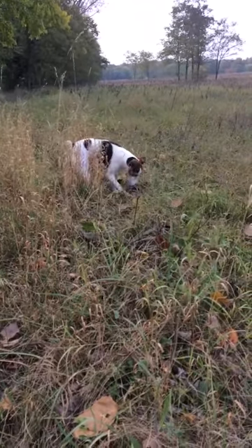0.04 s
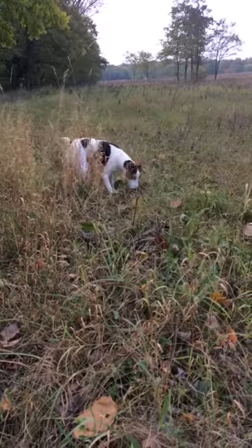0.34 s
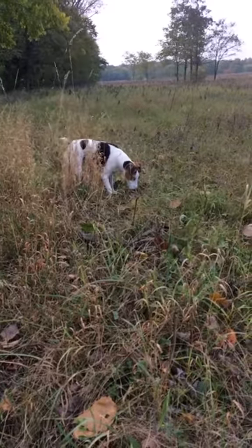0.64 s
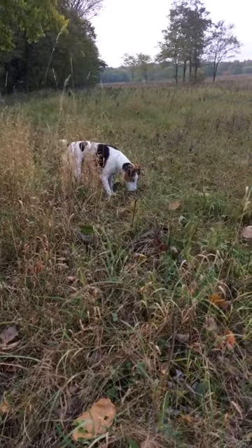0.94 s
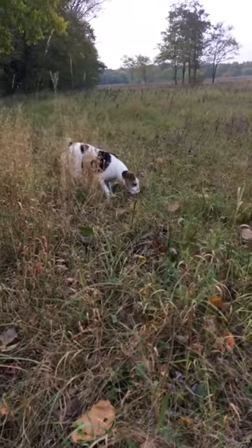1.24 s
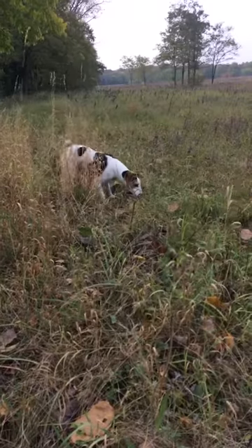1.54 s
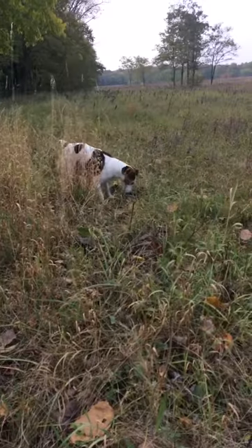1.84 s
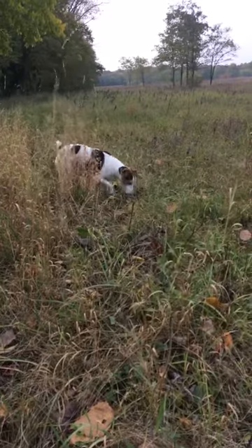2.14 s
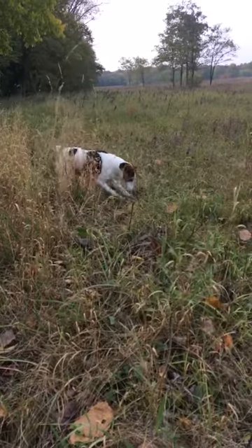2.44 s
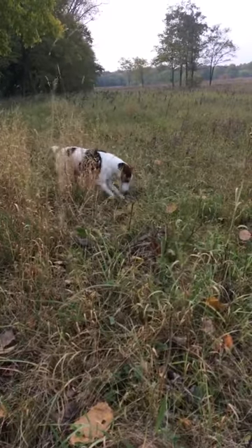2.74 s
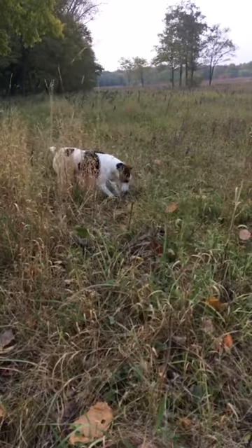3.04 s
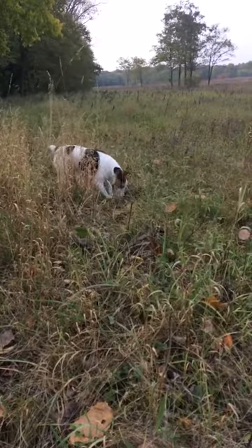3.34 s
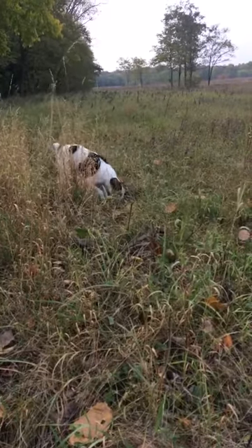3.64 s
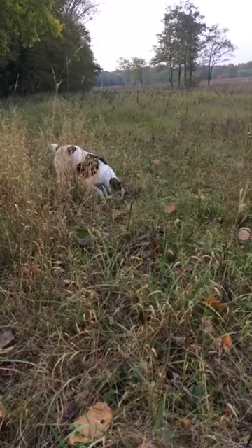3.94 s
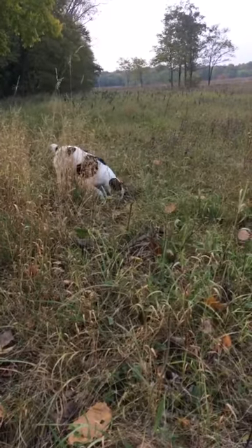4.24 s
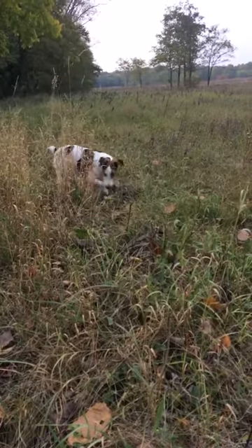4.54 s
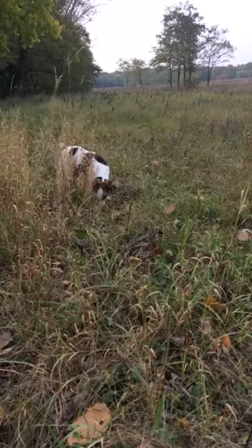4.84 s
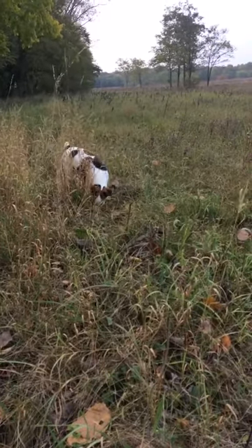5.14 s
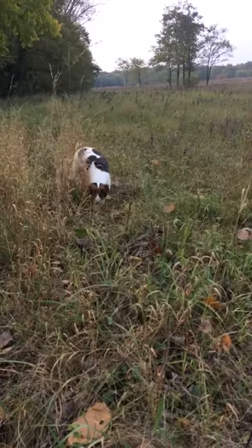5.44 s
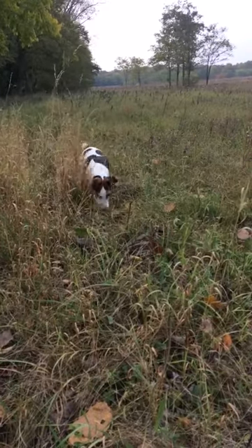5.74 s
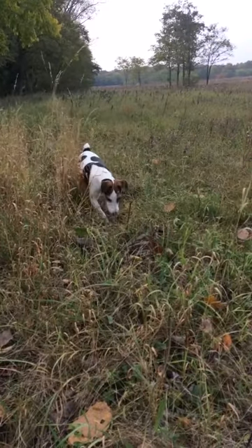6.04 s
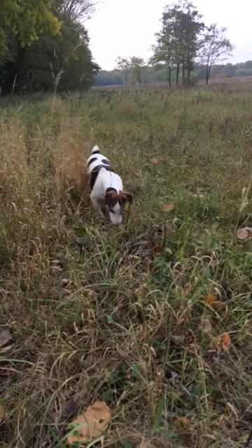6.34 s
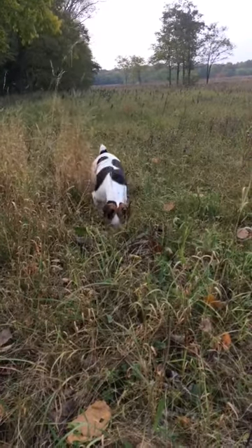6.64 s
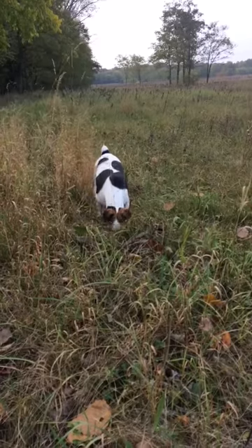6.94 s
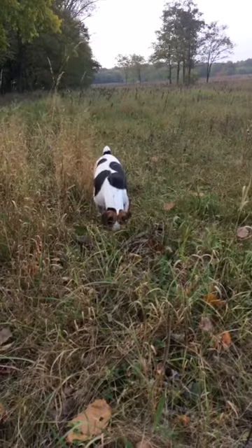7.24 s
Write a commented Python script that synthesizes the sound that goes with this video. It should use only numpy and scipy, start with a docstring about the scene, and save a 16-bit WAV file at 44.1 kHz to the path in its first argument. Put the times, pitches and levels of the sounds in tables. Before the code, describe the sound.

In an open field, low gusty wind rumbles on the microphone over a faint hiss. A few metres away a small dog pushes through dry grass with soft rustles, small stem snaps and faint quick sniffs. Just past the middle it gives one sharp snort, then moves on with more crackling. A bird chirps twice shortly after the snort, and another dog barks very faintly far off now and then.

```python
"""An open field: a few metres away a small dog noses through dry grass, sniffs, snorts once and walks on.
Air hisses through its nostrils; dry blades slide and tick, and stems snap under its paws.
Behind it are a low rumble of wind eddies and a faint hiss of open air.
A bird whistles two chirps, and another dog barks very far off."""
import sys
import numpy as np
from scipy import signal
from scipy.fft import rfft, irfft
from scipy.io import wavfile
from scipy.ndimage import uniform_filter1d

SR = 44100
rng = np.random.default_rng(int(sys.argv[2]) if len(sys.argv) > 2 else 0)


def transcribe(signal):
    """Save signal, clipped to [-1, 1], as a 16-bit WAV file at the path in sys.argv[1]."""
    frames = np.atleast_2d(signal).T
    limited = np.clip(frames, -1, 1)
    pcm = np.round(limited * 32767).astype(np.int16)
    wavfile.write(sys.argv[1], SR, pcm)


N = 326340
TIME = np.arange(N) / SR


def from_db(db):
    """Decibels to gain."""
    return 10 ** (np.asarray(db) / 20)


def unit(x):
    """Scales to rms 1."""
    return x / np.sqrt(np.mean(x ** 2) + 1e-20)


def gains(rows):
    """One gain curve over time per dB column."""
    times_s, *columns_db = np.transpose(rows)
    return [from_db(np.interp(TIME, times_s, db)) for db in columns_db]


def shape(spectrum, hz):
    """Gain of a spectrum at hz."""
    points_hz, db = np.transpose(spectrum)
    return from_db(np.interp(np.log(hz + 1), np.log(points_hz + 1), db))


def resonance(hz, centre_hz, width_hz):
    """Gain of a broad resonance, 1 at its centre."""
    return 1 / (1 + (2 * (hz - centre_hz) / width_hz) ** 2)


def coloured(x, spectrum):
    """Filters x by a spectrum, to rms 1."""
    hz = np.fft.rfftfreq(len(x), 1 / SR)
    return unit(irfft(rfft(x) * shape(spectrum, hz), len(x)))


def noise(spectrum):
    """Turbulence with a given spectrum."""
    return coloured(rng.standard_normal(N), spectrum)


def drift(rate_hz):
    """Smooth random wobble up to about rate_hz, rms 1."""
    hz = np.fft.rfftfreq(N, 1 / SR)
    return unit(irfft(rfft(rng.standard_normal(N)) * np.exp(-(hz / rate_hz) ** 2), N))


def add(mix, start_s, sound):
    """Mixes a sound in at start_s."""
    part = mix[max(round(start_s * SR), 0):][:len(sound)]
    part += sound[:len(part)]


def blast(start_s, attack_s, hold_s, release_s, scatter_db=-12, scatter_s=0.095):
    """Envelope of a blast of air: builds, holds, dies into a tail scattered back by the field."""
    rise = np.clip((TIME - start_s) / attack_s, 0, 1) ** 2
    after_s = np.maximum(TIME - start_s - attack_s - hold_s, 0)
    scatter = from_db(scatter_db) * np.exp(-after_s / scatter_s)
    return rise * np.hypot(np.exp(-after_s / release_s), scatter)


# Spectra of the nostril jet and the hollow rush. Each row: frequency in Hz, gain in dB.
JET_SPECTRUM = [(1470, -44), (2500, -18), (3820, -12), (4520, -9), (5500, -12), (6700, -3), (8540, -3.5),
                (10200, -2.5), (13300, -5.5), (15300, -5.5)]
RUSH_SPECTRUM = [(200, -8), (380, 11.5), (650, 7.5), (1150, 4), (1700, -1.5), (2500, 3.5), (3800, 9.5),
                 (5300, 8.5), (8000, 0), (14000, -17)]


def snort(start_s=4.455, rush_lead_s=0.071, jet_db=-44.5, rush_db=-54.5, flutter_db=1.26):
    """The dog blows its nose clear: a sharp jet over a slower, hollower rush as the nostrils flare."""
    jet = from_db(jet_db) * blast(start_s, attack_s=0.04, hold_s=0.02, release_s=0.017)
    rush = from_db(rush_db) * blast(start_s - rush_lead_s, attack_s=0.13, hold_s=0.03, release_s=0.019)
    flow = jet * noise(JET_SPECTRUM) + rush * noise(RUSH_SPECTRUM)
    return flow * from_db(flutter_db * drift(rate_hz=180))


# Draws of air. Each row: centre in seconds, level in dB, sigma in seconds, nostril resonance in Hz.
SNIFF_DRAWS = [(0.105, -68, 0.045, 4100), (0.119, -58, 0.0064, 4200), (0.909, -69, .012, 4000),
               (1.867, -69, 0.015, 3500), (2.387, -62.5, .025, 3400), (2.414, -61.5, 0.011, 3300),
               (2.445, -58.5, .010, 3650), (2.745, -70, .03, 3400), (3, -66.5, 0.014, 3100)]
# Hiss in the nose. Each row: frequency in Hz, gain in dB.
NOSE_SPECTRUM = [(250, -30), (480, 7), (800, -20), (1300, 5), (1900, -24), (3000, 6.5), (5500, 3),
                 (8000, 0), (14000, -34)]


def sniffs(width_hz=1100, ring_db=2):
    """Quick draws of air hiss in the nose and ring the narrowed nostrils."""
    out, t = np.zeros(N), np.arange(16384) / SR
    hz = np.fft.rfftfreq(len(t), 1 / SR)
    for centre_s, db, sigma_s, nostril_hz in SNIFF_DRAWS:
        colour = shape(NOSE_SPECTRUM, hz) + from_db(ring_db) * resonance(hz, nostril_hz, width_hz)
        flow = unit(irfft(rfft(rng.standard_normal(len(t))) * colour))
        start_s = max(centre_s - t[-1] / 2, 0)
        envelope = np.exp(-0.5 * ((start_s + t - centre_s) / sigma_s) ** 2)
        add(out, start_s, from_db(db) * flow * envelope)
    return out


# Paw and muzzle strokes. Each row: peak time in seconds, relative level in dB, rise and decay in seconds.
GRASS_BRUSHES = [(0.12, -69, 0.067), (0.34, -66, 0.06), (0.47, -69.5, 0.038), (1.365, -64.5, 0.069),
                 (1.59, -74, .04), (1.87, -67.5, 0.028), (1.99, -73, .025), (2.26, -70, .035),
                 (2.435, -63.5, 0.061), (2.555, -67.5, .025), (2.675, -64, 0.058), (2.755, -66.5, .045),
                 (2.9, -62, 0.025), (3.055, -65.5, 0.021), (3.17, -69, .04), (3.403, -66, 0.02),
                 (3.525, -63, 0.025), (4.845, -64, 0.045), (5.235, -68.5, .03), (5.375, -65.5, 0.032),
                 (5.45, -67, 0.017), (5.58, -61.5, 0.044), (5.735, -67.5, .05), (5.875, -63, 0.042),
                 (6.185, -63.5, 0.043), (6.32, -67.5, 0.032), (6.57, -70.5, .06), (6.72, -74, .06),
                 (6.915, -66, 0.059), (7.07, -71, .03)]
# Body dragging through stems. Each row: time in seconds, relative level in dB.
BODY_DRAG = [(0.0, -81), (0.7, -95), (1.4, -79), (2.05, -88), (2.7, -69), (3.8, -93), (4.4, -90),
             (5.1, -81), (5.7, -74), (6.9, -72.5), (7.4, -80)]


def pushing():
    """Envelope of the dog's push through the grass: brushes and body drag, summed in power."""
    power = gains(BODY_DRAG)[0] ** 2
    for peak_s, db, decay_s in GRASS_BRUSHES:
        away_s = abs(TIME - peak_s)
        near = away_s < 8 * decay_s
        power[near] += (from_db(db) * np.exp(-away_s[near] / decay_s)) ** 2
    return np.sqrt(power)


# Dry blades rubbing. Each row: frequency in Hz, gain in dB.
GRASS_SPECTRUM = [(500, 1), (1200, -1), (2200, 1.5), (3500, 3), (5500, 1.5), (8000, 2), (12000, 4),
                  (15500, 2.5)]


def rustle(gain_db=4, ticks_per_s=1800, spread_db=2.5, clump_db=0.2):
    """Dry blades slide over each other and let go in tiny ticks."""
    ticks = (rng.random(N) < ticks_per_s / SR) * rng.choice([-1, 1], N)
    sizes = from_db(spread_db * np.minimum(rng.exponential(1, N), 5))
    slide = rng.standard_normal(N)
    contact = unit(ticks * sizes) + slide
    clumps = from_db(clump_db * drift(rate_hz=46))
    return from_db(gain_db) * pushing() * coloured(contact * clumps, GRASS_SPECTRUM)


# Breaking stems; thick ones sound lower. Each row: start in seconds, peak in dB, crack pitch in Hz.
STEM_SNAPS = [(1.2186, -53, 12000), (2.251, -47, 10000), (2.2972, -51, 11000), (2.6865, -50, 12500),
              (2.836, -54, 10000), (2.8974, -54, 11000), (3.403, -44, 10500), (4.8204, -49, 10000),
              (4.8469, -46, 13500), (4.8753, -40.5, 11500), (5.224, -44, 5000), (5.4485, -45, 6000),
              (6.162, -42.5, 5600), (6.172, -46, 7000), (6.186, -49, 4800), (6.198, -50, 11000),
              (6.6135, -49.5, 13500), (6.634, -33, 13000)]
# Broadband part of a crack. Each row: frequency in Hz, gain in dB.
STEM_SPECTRUM = [(500, -28), (1500, -14), (3500, -20), (8000, -20), (15500, -17)]


def snaps(crack_s=0.00047, shiver_s=0.004, shiver_db=-21):
    """A stem breaks with a crack, then shivers against its neighbours."""
    out, t = np.zeros(N), np.arange(2048) / SR
    hz = np.fft.rfftfreq(len(t), 1 / SR)
    decay = np.exp(-t / crack_s) + from_db(shiver_db) * np.exp(-t / shiver_s)
    for start_s, peak_db, crack_hz in STEM_SNAPS:
        colour = shape(STEM_SPECTRUM, hz) + resonance(hz, crack_hz, width_hz=0.53 * crack_hz)
        crack = irfft(rfft(rng.standard_normal(len(t))) * colour) * decay
        add(out, start_s, from_db(peak_db) * crack / abs(crack).max())
    return out


# Wind strength. Each row: time in seconds, relative buffet level in dB, relative drone level in dB.
WIND_STRENGTH = [(0.0, -39.5, -52), (0.65, -38.5, -47.5), (1.3, -44, -48), (2.0, -43, -49.5),
                 (2.55, -45.5, -51.5), (3.3, -44, -51), (3.7, -44.5, -49.5), (4.7, -47.5, -49.5),
                 (6.0, -50, -50), (7.4, -46, -52.5)]
# Strongest gusts. Each row: centre in seconds, buffet boost in dB.
WIND_GUSTS = [(0.11, 2.5), (0.64, 6.5), (0.9, 4.5), (1.21, 8), (1.58, 7.5), (1.94, 6), (2.13, 7),
              (3.08, 7.5), (3.75, 4.5), (4.35, 4), (5.43, 7), (6.3, 4)]
# Spectra of the deep buffeting and the drone. Each row: frequency in Hz, gain in dB.
BUFFET_SPECTRUM = [(18, -36), (30, -8), (42, -12), (58, -1), (78, 0.5), (100, -4), (135, -13), (190, -29),
                   (300, -69)]
DRONE_SPECTRUM = [(70, -19), (110, -1), (135, 1), (165, -2.5), (210, -8), (250, -18), (300, -24.5),
                  (400, -60), (600, -55)]


def wind(drone_gain_db=1.5, gust_sigma_s=0.026, steadiness=0.39):
    """Deep gusty eddies and a drone above them, both easing off slowly."""
    out = np.zeros(N)
    buffet, drone = gains(WIND_STRENGTH)
    gust_db = sum(db * np.exp(-0.5 * ((TIME - s) / gust_sigma_s) ** 2) for s, db in WIND_GUSTS)
    buffet *= from_db(gust_db)
    drone *= from_db(drone_gain_db)
    for spectrum, strength in ((BUFFET_SPECTRUM, buffet), (DRONE_SPECTRUM, drone)):
        eddies = noise(spectrum)
        local_power = uniform_filter1d(eddies ** 2, size=8000) + 1e-9
        out += strength * unit(eddies / local_power ** (steadiness / 2))  # partly evens out random swells
    return out


# Chirps. Each row: start in seconds, length in seconds, top pitch in Hz, sag in Hz/s, level in dB.
BIRD_CHIRPS = [(5.061, 0.059, 4270, 0, -64.5), (5.309, 0.061, 4420, 3500, -64.5)]


def bird(flick_s=0.0172, flick_hz=1150, attack_s=0.016, release_s=0.013, echo_s=0.046, echo_db=-11):
    """Two thin whistles flick up to pitch; the edge of the wood returns them."""
    out = np.zeros(N)
    for start_s, length_s, top_hz, sag_hz_per_s, db in BIRD_CHIRPS:
        t = np.arange(0, length_s, 1 / SR)
        hz = top_hz - flick_hz * np.maximum(1 - t / flick_s, 0)
        hz -= sag_hz_per_s * np.maximum(t - flick_s, 0)
        envelope = np.minimum(t / attack_s, 1) ** 1.5 * np.minimum((length_s - t) / release_s, 1)
        note = np.sqrt(2) * from_db(db) * envelope * np.sin(2 * np.pi * np.cumsum(hz) / SR)
        add(out, start_s, note)
        add(out, start_s + echo_s, from_db(echo_db) * note)
    return out


# Distant barks. Each row: centre in seconds, top pitch in Hz, level in dB.
FAR_BARKS = [(0.525, 640, -74.5), (0.725, 835, -73.5), (3.075, 945, -69), (3.115, 820, -75),
             (4.0, 900, -78), (4.065, 920, -73.5), (4.165, 960, -74.5), (5.17, 940, -72),
             (6.39, 942, -67.5)]


def far_dog(length_s=0.115, arch=0.08, hoarseness=0.019, tail_s=0.2, tail_db=-8):
    """Distance leaves only the strongest partial of each arched, hoarse bark; trees add a soft tail."""
    barks, position = np.zeros(N), np.linspace(-1, 1, int(length_s * SR))
    envelope = np.hanning(len(position))
    jitter = hoarseness * drift(rate_hz=180)
    for centre_s, top_hz, db in FAR_BARKS:
        hz = top_hz * (1 - arch * position ** 2 + jitter[round(centre_s * SR):][:len(position)])
        partial = np.sqrt(2) * np.sin(2 * np.pi * np.cumsum(hz) / SR)
        add(barks, centre_s - length_s / 2, from_db(db) * envelope * partial)
    tail = rng.standard_normal(SR) * np.exp(-TIME[:SR] / tail_s)
    return barks + from_db(tail_db) * signal.fftconvolve(barks, tail / np.linalg.norm(tail))[:N]


# Open-air hiss. Each row: frequency in Hz, gain in dB.
AIR_SPECTRUM = [(200, -17.5), (330, -1.5), (400, -4.5), (620, -5.5), (800, -8), (950, -6.5), (1300, -9),
                (2000, -10.5), (2500, -10), (3700, -9), (4500, -11.5), (5500, -12.5), (10000, -17.5),
                (15300, -26)]


def air(level_db=-65, waver_db=0.7):
    """Even hiss of the open field and its far trees."""
    return from_db(level_db) * noise(AIR_SPECTRUM) * from_db(waver_db * drift(rate_hz=6.2))


def scene():
    """Field, dog in the grass and far animals, in mono."""
    return (wind() + air() + rustle() + snaps() + sniffs() + snort() + bird() + far_dog())[None]


def record(dry):
    """Steep low-pass on the top of the treble."""
    cutoff_hz = 15400
    lowpass = signal.firwin(801, cutoff_hz, window=("kaiser", 9), fs=SR)
    return signal.oaconvolve(dry, lowpass[None], "same")


dry = scene()
out = record(dry)
transcribe(out)
```